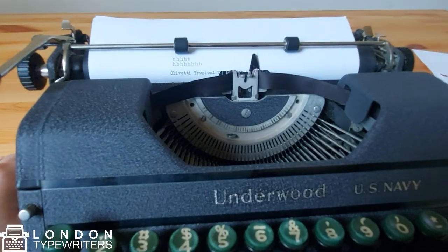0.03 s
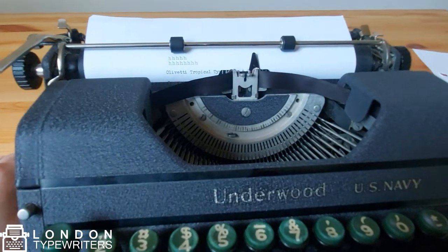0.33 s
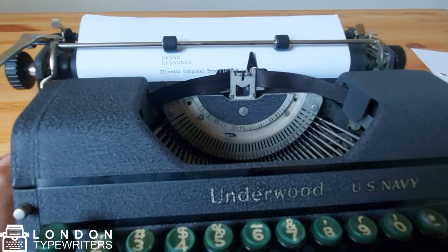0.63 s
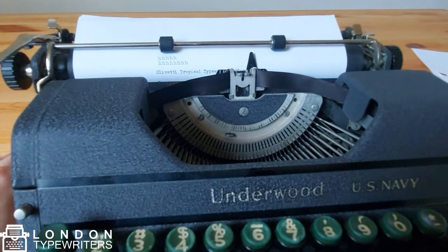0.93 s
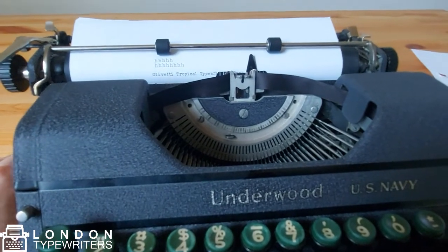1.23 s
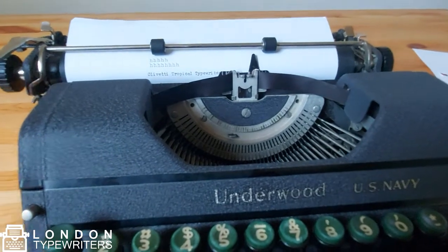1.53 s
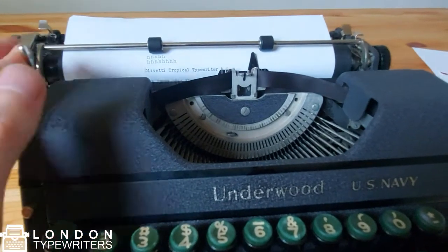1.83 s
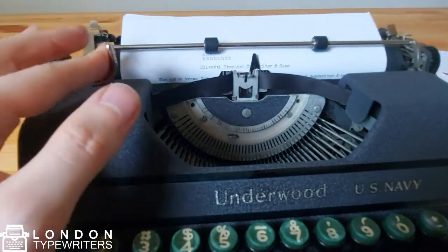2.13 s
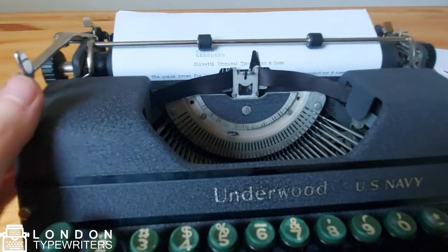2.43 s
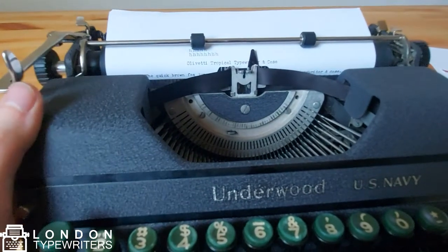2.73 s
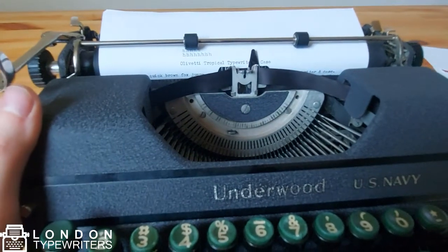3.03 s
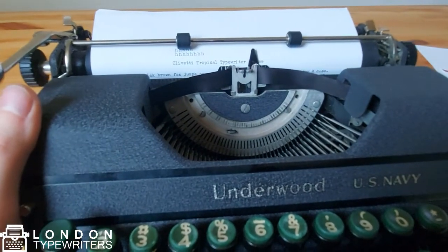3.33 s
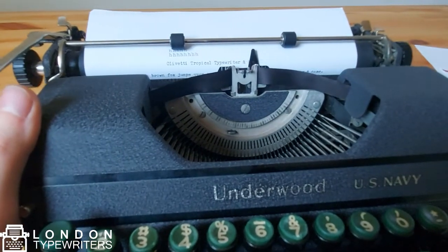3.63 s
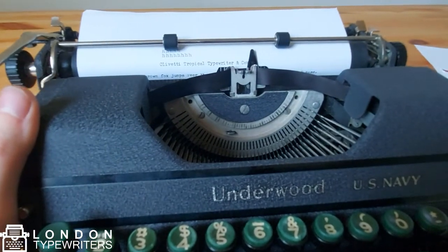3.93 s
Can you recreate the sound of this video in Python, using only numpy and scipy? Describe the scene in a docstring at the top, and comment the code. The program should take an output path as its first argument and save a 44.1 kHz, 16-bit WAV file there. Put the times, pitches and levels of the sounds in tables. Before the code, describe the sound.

Manual typewriter keys clacking, with a carriage return midway and two faint bell dings.

```python
"""A manual typewriter on a wooden desk, heard from close by in a small quiet room.
Each key rattles its linkage, slaps a type bar on the platen and shakes frame and desk;
the escapement snaps as the key comes up. Hard-pressed levers clunk.
Midway the carriage is pushed back over its ratchet against the stop. The margin bell rings twice."""
import sys
import numpy as np
from scipy import signal
from scipy.fft import rfft, irfft
from scipy.io import wavfile

SR = 44100
rng = np.random.default_rng(int(sys.argv[2]) if len(sys.argv) > 2 else 0)


def inscribe(sig):
    """Save sig as 16-bit PCM at rate SR to the path in sys.argv[1].

    A 1-D sig is mono; a 2-D sig holds one channel per row.
    Samples are clipped to [-1, 1] before scaling.
    """
    pcm = np.round(np.clip(np.atleast_2d(sig).T, -1, 1) * 32767)
    wavfile.write(sys.argv[1], SR, pcm.astype(np.int16))


N = 176400
TIME_S = np.arange(N) / SR
BIN_HZ = np.maximum(np.arange(N // 2 + 1) * SR / N, 1)

# Type bar strikes. Each row: time in seconds, slap in dB, thump in dB.
BAR_STRIKES = [(-.09, -17, -21), (0.0875, -30.5, -27.5), (.459, -31.5, -30.5), (.634, -30, -27),
               (0.8538, -30, -27.5), (1.244, -28.5, -24.5), (1.4223, -27, -23), (1.5873, -26.5, -24),
               (1.7682, -31.5, -28.5), (2.558, -25, -24), (2.7374, -24.5, -24.5), (2.895, -24, -21.5),
               (3.067, -26, -23.5), (3.2307, -26, -22.5), (3.4027, -25, -22), (3.5764, -25, -23),
               (3.7574, -25, -23.5), (3.939, -26.5, -22.5)]
# Keys and space bar coming up. Each row: time in seconds, snap in dB, thud in dB.
KEY_RELEASES = [(-.004, -36, -43.5), (0.3463, -33, -47.5), (0.528, -26.5, -41), (0.7371, -26, -44),
                (1.1116, -30, -43), (1.3168, -23, -38.5), (1.4808, -23.5, -33), (1.6428, -21.5, -31.5),
                (1.877, -40.5, -48.5), (2.617, -20, -32), (2.7884, -21.5, -29.5), (2.9572, -21, -31.5),
                (3.1312, -21, -35), (3.3001, -21, -30), (3.474, -22, -35.5), (3.655, -24, -33.5),
                (3.8254, -22, -37.5)]
# Bell taps. Each row: time in seconds, low modes in dB, high modes in dB (more for a harder tap).
BELL_TAPS = [(.476, -39.5, -39.5), (3.762, -35.5, -44)]
# Keys and return lever taking load. Each row: time in seconds, level in dB.
LEVER_CLUNKS = [(1.395, -36.5), (1.56, -31), (1.747, -36), (1.899, -43.5), (1.978, -39), (2.533, -35),
                (2.871, -34), (3.209, -41.5)]
# Return lever and carriage hitting stops. Each row: time in seconds, then clack, frame and desk in dB.
STOP_KNOCKS = [(1.975, -31.5, -41.5, -43), (2.2891, -24, -24, -27.5), (2.3553, -24, -44, -30),
               (2.4354, -25.5, -27, -36)]
# Pawl skipping over the rack, then clicking on the rebound. Each row: time in seconds, level in dB.
PAWL_TICKS = [(2.018, -31), (2.024, -28), (2.0462, -30), (2.062, -39), (2.078, -29.5), (2.0928, -32),
              (2.1062, -29.5), (2.1202, -31), (2.134, -30), (2.143, -30), (2.155, -29), (2.169, -28.5),
              (2.1814, -38), (2.1966, -33), (2.2205, -32.5), (2.2842, -25), (2.3213, -23.5), (2.362, -21),
              (2.398, -27)]
# Envelope of rail friction and rebound scrape. Each row: time in seconds, level in dB.
RAIL_FRICTION = [(1.92, -59), (2.05, -44), (2.16, -43.5), (2.21, -42.5), (2.24, -67), (2.28, -66),
                 (2.31, -40.5), (2.4, -43.5), (2.45, -55)]

# Body modes. Each row: frequency in Hz, relative level in dB, swell in seconds, T60 in seconds.
PLATEN_MODES = [(615.7, -1.5, 0.0022, 0.046), (841, -17.5, 0.0018, 0.11), (953, -9.5, 0.00092, 0.046),
                (1966, -18, 0.00058, 0.052)]
FRAME_MODES = [(290.3, 16.5, 0.018, 0.068), (269.9, -8, 0.047, 0.35), (360.4, -8, 0.027, 0.18),
               (437.4, -12, 0.0041, .12)]
DESK_MODES = [(43, -19, 0.031, .8), (80, -12, 0.01, 0.36), (109.96, 4.5, 0.035, 0.28)]
BELL_MODES = [(3139, -10, .002, 1.5), (3243, -13, .002, 1.1), (7792, 0, .006, 1.4), (13786, -1, .002, .55),
              (13990, -1, .002, .42)]

# Noise colours. Each row: frequency in Hz, relative spectral density in dB.
SLAP_COLOUR = [(150, 2.5), (450, 8.5), (900, 9), (1400, 0), (2350, 5), (3300, -2), (5000, 4), (7000, -1.5),
               (10000, 2), (12800, 4.5), (16000, -3.5)]
CLACK_COLOUR = [(150, -1), (550, 13), (1400, -3), (2200, 1.5), (3300, -0.5), (5000, 1.5), (7500, -1.5),
                (10500, 4), (12800, 5), (16000, -6)]
SNAP_COLOUR = [(200, 4.5), (700, 0), (1400, -2), (2200, 4.5), (3300, -2.5), (4600, 2.5), (7500, -2.5),
               (10500, 3), (12000, 2), (12900, 12.5), (14000, -4.5), (16000, 2.5)]
CLUNK_COLOUR = [(150, 1), (500, 0), (950, -3), (1450, -14), (16000, -26)]
PAWL_COLOUR = [(700, 3.5), (1400, -16), (2200, 2), (3400, -2.5), (6000, 0.5), (8000, -2), (12800, 8.5),
               (16000, 0)]
HUSH_COLOUR = [(45, 29), (110, 18), (1000, 0), (16000, -12)]

# Room decay. Each row: frequency in Hz, T60 in seconds.
REVERB_T60_S = [(200, 0.67), (1100, 0.4), (15000, 0.33)]
# Room gain. Each row: frequency in Hz, level in dB.
REVERB_DB = [(100, 0), (300, -11.5), (600, -6.5), (1200, -5.5), (3000, -8), (8000, -9.5), (15000, -11.5)]
# Stereo likeness of noise and room tail. Each row: frequency in Hz, left-right correlation.
NOISE_CORRELATION = [(100, 0.89), (500, 0.41), (1000, 0.2), (2300, 0.38), (4500, -0.21), (8000, 0.36),
                     (13000, 0.48)]
REVERB_CORRELATION = [(100, 1), (1500, -0.046), (4500, -0.18), (9000, 1)]
# Microphone balance. Each row: frequency in Hz, left minus right in dB.
MIC_BALANCE_DB = [(100, -1), (1200, .8), (4500, -1.6), (9000, .6), (13500, -2.8)]

KEY_TRAVEL_S = .035  # touch to strike
KEY_TICK_DB, LINKAGE_DB, LINKAGE_RISE_DB = -11.5, -16, 9.5  # relative to the slap
JINGLE_DB, JINGLE_T60_S = -22, 0.43  # loose parts, relative to the slap
SHAKE_LAG_S, FALL_BACK_S = 0.00167, 0.004835  # slap to body ring; snap to key landing
NEW_LINE_PLATEN_DB, STEADYING_HAND_DB = 3.5, -2  # after the return: platen rings more, hand damps desk
BRACE_DB, BRACE_S = -9, 0.019  # a finger driving a key briefly stills the desk
HUSH_DB, CUTOFF_HZ = -66, 15900


def from_db(db):
    """Decibels to gain."""
    return 10 ** (np.asarray(db) / 20)


def decay(time_s, t60_s):
    """Exponential fall, 60 dB in t60_s."""
    return np.exp(-np.log(1000) * time_s / t60_s)


def at_hz(table, hz):
    """Read a table on a log-frequency axis."""
    knots_hz, values = np.transpose(table)
    return np.interp(np.log(hz), np.log(knots_hz), values)


def noise(colour, grain_db):
    """Grainy stereo noise, rms 1: the dense ringing of many small parts."""
    grains = from_db(grain_db * np.repeat(rng.standard_normal(N // 16 + 1), 16)[:N])
    mid, side = rfft(rng.standard_normal((2, N)) * grains) * from_db(at_hz(colour, BIN_HZ))
    alike = np.clip(at_hz(NOISE_CORRELATION, BIN_HZ), -.99, .99)
    stereo = irfft(np.sqrt(1 + alike) * mid + np.sqrt(1 - alike) * side * [[1], [-1]], N)
    return stereo / stereo.std()


def chatter(depth_db):
    """Loose parts touch unevenly: a new random gain every 3 ms."""
    knots_s = np.arange(0, N / SR, .003)
    return from_db(depth_db * np.interp(TIME_S, knots_s, rng.uniform(-0.91, 1, len(knots_s))))


def blows(times_s, levels_db, attack_s, t60_s, ring_db, ring_t60_s, hold_s=0):
    """Contact envelope: quick rise, hold, fast fall, weaker after-ring."""
    power = np.zeros(N)
    for at_s, db in zip(times_s, levels_db):
        near = slice(max(int((at_s - .03) * SR), 0), int((at_s + .4) * SR))
        t = TIME_S[near] - at_s
        rise = np.exp(np.minimum(t, 0) / attack_s)
        after_s = np.maximum(t - hold_s, 0)
        fall = decay(after_s, t60_s) + from_db(ring_db) * decay(after_s, ring_t60_s)
        power[near] += (from_db(db) * rise * fall) ** 2
    return np.sqrt(power)


def struck(modes, times_s, levels_db, vary_db, detune, spread_rad=0):
    """Each blow rings all modes of a body, with random strength, pitch and left-right phase gap."""
    hz, mode_db, swell_s, t60_s = np.transpose(modes)[:, :, None]
    stereo = np.zeros((2, N))
    t = TIME_S[:int(t60_s.max() * SR)]
    shape = from_db(mode_db) * (1 - np.exp(-t / swell_s)) * decay(t, t60_s)
    for at_s, db in zip(times_s, levels_db):
        strength, pitch, gap = rng.standard_normal((3, len(modes), 1))
        phase = 2 * np.pi * hz * (1 + detune * pitch) * t
        envelope = shape * from_db(db + vary_db * strength)
        mid = (envelope * np.cos(spread_rad * gap) * np.sin(phase)).sum(0)
        side = (envelope * np.sin(spread_rad * gap) * np.cos(phase)).sum(0)
        index = int(at_s * SR) + np.arange(len(t))
        heard = (index >= 0) & (index < N)
        stereo[:, index[heard]] += mid[heard] + side[heard] * [[1], [-1]]
    return stereo


def linkage(strikes_s, slaps_db):
    """Envelope of the linkage rattle, growing over each key's travel."""
    swing = np.zeros(N)
    for at_s, db in zip(strikes_s, slaps_db):
        moving = (TIME_S > at_s - KEY_TRAVEL_S) & (TIME_S < at_s)
        rise_db = LINKAGE_RISE_DB * (TIME_S[moving] - at_s) / KEY_TRAVEL_S
        swing[moving] += from_db(db + LINKAGE_DB + rise_db)
    return swing * chatter(depth_db=6)


def type_bars():
    """The key ticks, the bar swings, slaps the platen and shakes frame, desk and loose parts."""
    at_s, slap_db, thump_db = np.transpose(BAR_STRIKES)
    tick = blows(at_s - KEY_TRAVEL_S, slap_db + KEY_TICK_DB,
                 attack_s=0.00076, t60_s=0.019, ring_db=-23, ring_t60_s=0.11)
    tick = tick * noise(CLACK_COLOUR, grain_db=-6.5)
    swing = linkage(at_s, slap_db)
    slap = blows(at_s, slap_db,
                 attack_s=0.0017, t60_s=0.062, ring_db=-13.5, ring_t60_s=0.082, hold_s=0.0013)

    shake_s = at_s + SHAKE_LAG_S
    new_line = at_s > STOP_KNOCKS[-1][0]
    platen_db = thump_db + NEW_LINE_PLATEN_DB * new_line
    desk_db = thump_db + STEADYING_HAND_DB * new_line
    platen = struck(PLATEN_MODES, shake_s, platen_db, vary_db=3, detune=0.02, spread_rad=0.09)
    frame = struck(FRAME_MODES, shake_s, thump_db, vary_db=0, detune=0.024, spread_rad=0.32)
    desk = struck(DESK_MODES, shake_s, desk_db, vary_db=1.5, detune=0.024, spread_rad=0.071)
    braced = from_db(BRACE_DB * np.exp(-((TIME_S - at_s[:, None]) / BRACE_S) ** 2).sum(0))

    since_s = np.maximum(TIME_S - at_s[:, None], 0)
    jingles = from_db(slap_db[:, None] + JINGLE_DB) * (since_s > 0) * decay(since_s, JINGLE_T60_S)
    jingle = jingles.sum(0) * chatter(depth_db=-5)
    clatter = (slap + swing + jingle) * noise(SLAP_COLOUR, grain_db=1.5)
    return tick + clatter + platen + frame + desk * braced


def escapement():
    """A bright steel snap, then a thud as the key falls back."""
    at_s, snap_db, thud_db = np.transpose(KEY_RELEASES)
    snap = blows(at_s, snap_db,
                 attack_s=0.00098, t60_s=0.016, ring_db=-20.5, ring_t60_s=0.21, hold_s=0.00038)
    snap = snap * noise(SNAP_COLOUR, grain_db=-0.5)
    land_s = at_s + FALL_BACK_S
    settle = blows(land_s, thud_db - 4.5, attack_s=0.0017, t60_s=0.054, ring_db=-19, ring_t60_s=0.066)
    settle = settle * noise(SLAP_COLOUR, grain_db=-1.5) * chatter(depth_db=6)
    thud = struck(FRAME_MODES + PLATEN_MODES, land_s, thud_db, vary_db=4, detune=0.022)
    return snap + settle + thud


def margin_bell():
    """A small tapped steel bell: three low modes, two high."""
    at_s, low_db, high_db = np.transpose(BELL_TAPS)
    low = struck(BELL_MODES[:3], at_s, low_db, vary_db=.5, detune=0, spread_rad=.4)
    high = struck(BELL_MODES[3:], at_s, high_db, vary_db=.5, detune=0, spread_rad=.4)
    return low + high


def levers():
    """A hard-pressed lever takes up its load with a dull, hollow clunk."""
    clunks = blows(*np.transpose(LEVER_CLUNKS),
                   attack_s=0.0033, t60_s=0.1, ring_db=-53, ring_t60_s=0.091, hold_s=0.0057)
    return clunks * noise(CLUNK_COLOUR, grain_db=3.5)


def carriage_return():
    """The lever clacks; the carriage slides, pawl ticking, and hits the stop."""
    at_s, clack_db, frame_db, desk_db = np.transpose(STOP_KNOCKS)
    clacks = blows(at_s, clack_db,
                   attack_s=0.0016, t60_s=0.032, ring_db=-16.5, ring_t60_s=0.13, hold_s=0.00088)
    clacks = clacks * noise(CLACK_COLOUR, grain_db=0.5)
    body = struck(FRAME_MODES + PLATEN_MODES, at_s, frame_db, vary_db=1, detune=0.024)
    desk = struck(DESK_MODES, at_s, desk_db, vary_db=1, detune=0.016)
    ticks = blows(*np.transpose(PAWL_TICKS),
                  attack_s=0.00048, t60_s=0.019, ring_db=-21.5, ring_t60_s=0.067, hold_s=0.0011)
    ticks = ticks * noise(PAWL_COLOUR, grain_db=3)
    slide_db = np.interp(TIME_S, *np.transpose(RAIL_FRICTION), left=-np.inf, right=-np.inf)
    slide = from_db(slide_db) * noise(SLAP_COLOUR, grain_db=2.5) * chatter(depth_db=4)
    return clacks + body + desk + ticks + slide


def room(direct, build_s):
    """Diffuse after-ring of casing and room, dying band by band."""
    t = TIME_S[:SR * 3 // 4]
    tail = 0
    edges_hz = np.geomspace(30, 19000, 13)
    for low_hz, high_hz in zip(edges_hz, edges_hz[1:]):
        hz = np.sqrt(low_hz * high_hz)
        bandpass = signal.butter(2, [low_hz, high_hz], "band", fs=SR, output="sos")
        band = signal.sosfilt(bandpass, rng.standard_normal((2, len(t))))
        band = band * (1 - np.exp(-t / build_s)) * decay(t, at_hz(REVERB_T60_S, hz))
        alike = np.clip(at_hz(REVERB_CORRELATION, hz), -.99, .99)
        share = np.array([[1 + alike], [1 - alike]]) * (high_hz - low_hz) / SR
        energy = (band ** 2).sum(1, keepdims=True)
        tail = tail + band * from_db(at_hz(REVERB_DB, hz)) * np.sqrt(share / energy)
    mid, side = signal.fftconvolve(direct, tail, axes=1)[:, :N]
    return mid + side * [[1], [-1]]


def scene():
    """The machine in its room, the dry bell and a faint hush."""
    machine = type_bars() + levers() + escapement() + carriage_return()
    hush = from_db(HUSH_DB) * noise(HUSH_COLOUR, grain_db=0)
    return machine + room(machine, build_s=0.0039) + margin_bell() + hush


def record(dry):
    """Two microphones of slightly different colour, then a steep low-pass."""
    balance = from_db(at_hz(MIC_BALANCE_DB, BIN_HZ) * [[.5], [-.5]])
    lowpass = signal.ellip(10, .3, 80, CUTOFF_HZ, fs=SR, output="sos")
    return signal.sosfilt(lowpass, irfft(rfft(dry) * balance, N))


dry = scene()
out = record(dry)
inscribe(out)
```